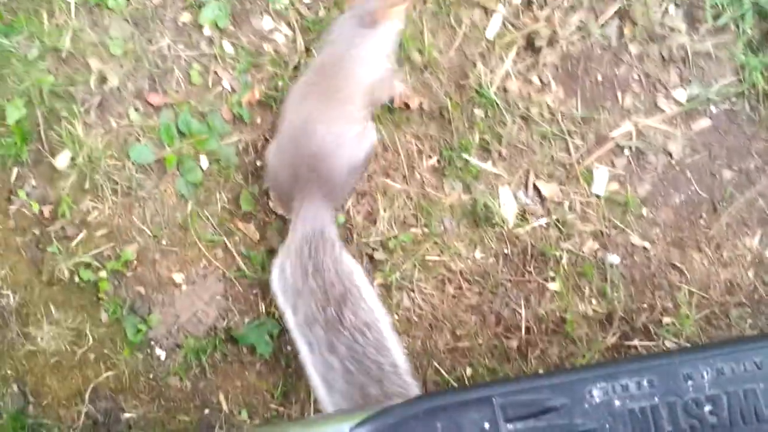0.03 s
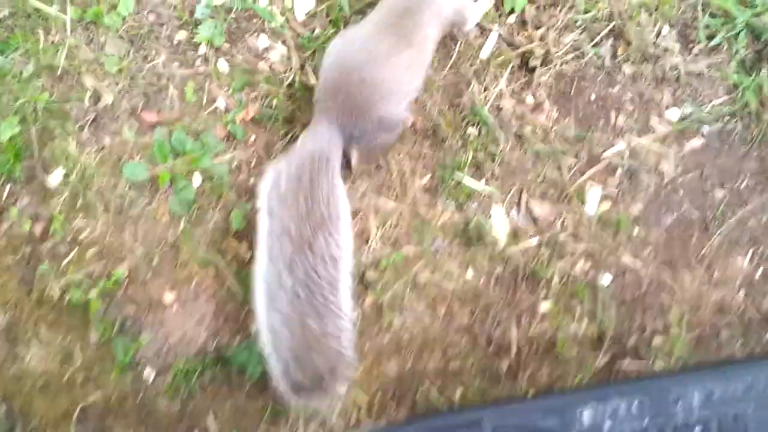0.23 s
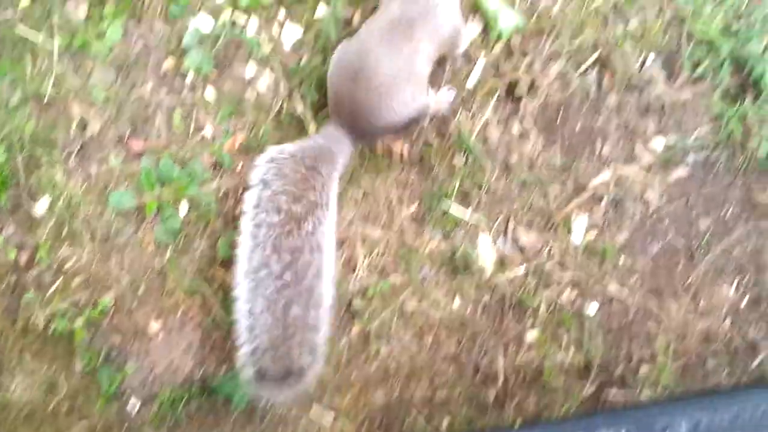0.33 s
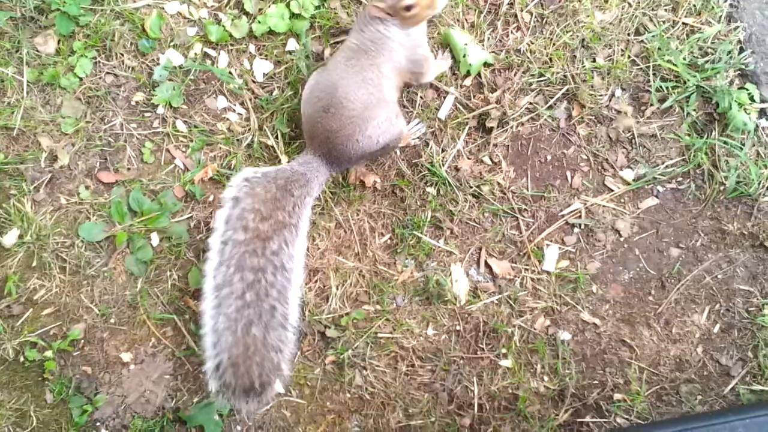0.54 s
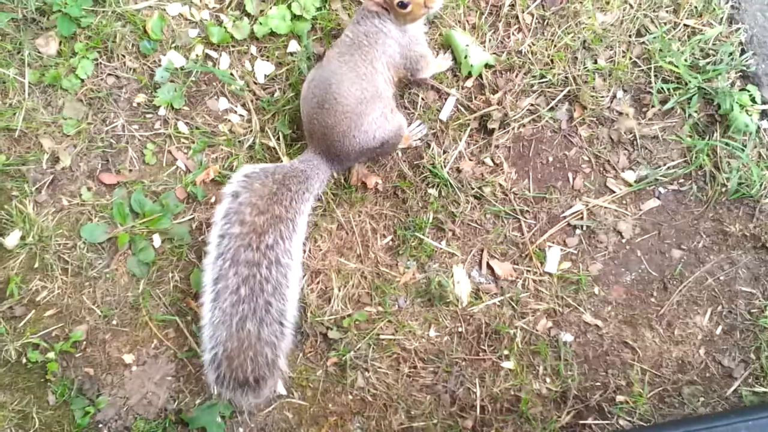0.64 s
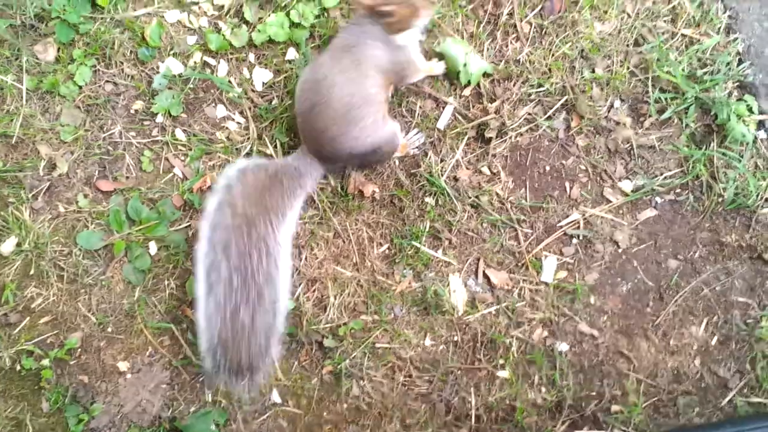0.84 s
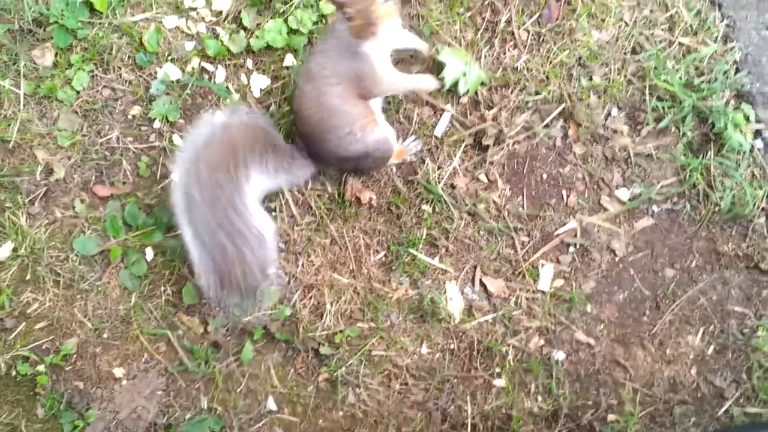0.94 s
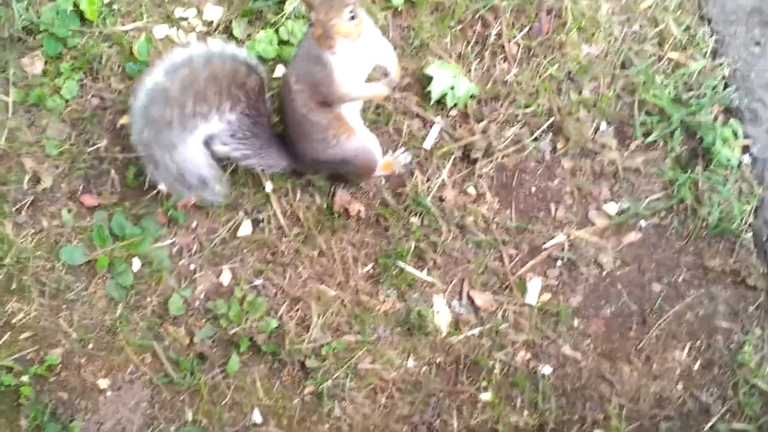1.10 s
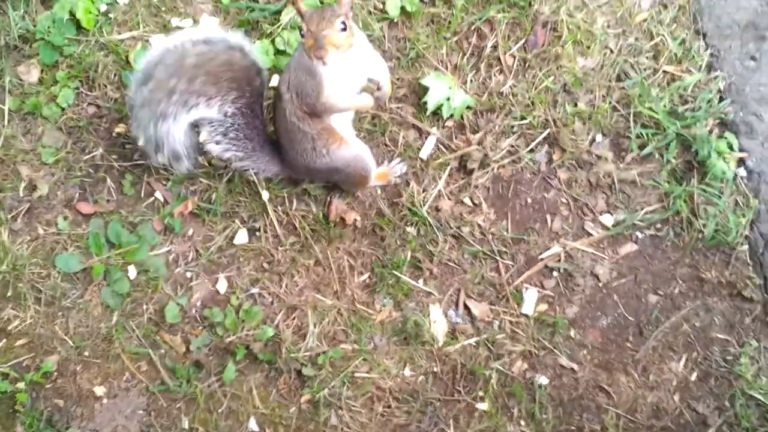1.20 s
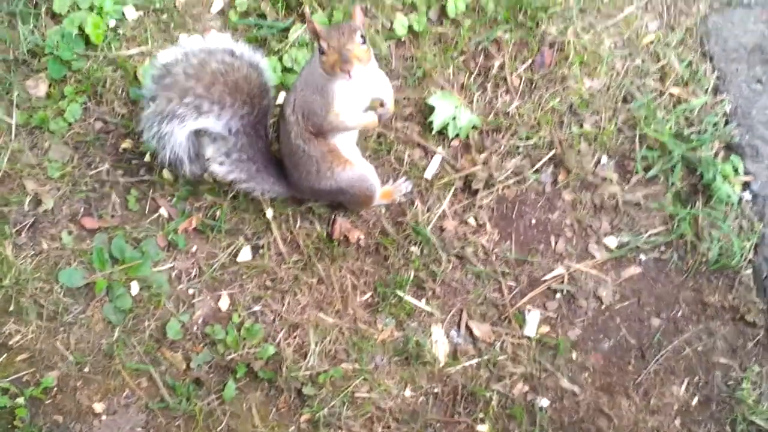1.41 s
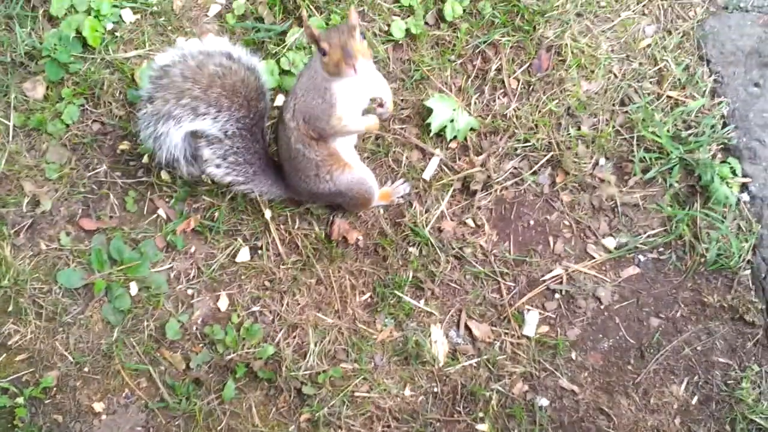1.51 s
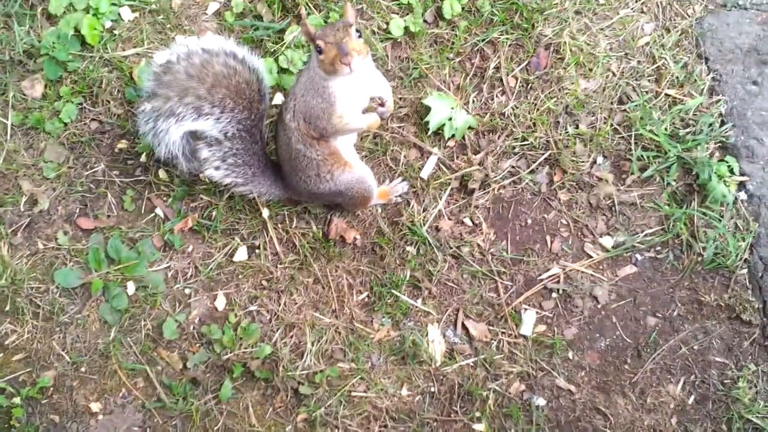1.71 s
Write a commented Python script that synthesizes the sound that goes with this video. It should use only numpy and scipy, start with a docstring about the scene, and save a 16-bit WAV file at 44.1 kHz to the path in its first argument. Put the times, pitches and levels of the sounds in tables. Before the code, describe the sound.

A small bird close to the microphone gives three quick, high, slightly raspy chirps, then a fourth after a pause. A distant bird answers faintly. Dry grass rustles softly over a low outdoor rumble on a lawn.

```python
"""A small bird close to the microphone gives four short, arching chirps over a lawn, the middle two
almost joined. Its syrinx starts each as a low rasp, leaps to a clear whistle and sinks in a second,
lower arch; the yard echoes briefly. A bird far off answers once. Dry litter rustles and ticks
faintly over a distant outdoor rumble. There is one soft handling thump on the microphone, and later
two faint low swells. Both channels carry the same sound."""
import sys
import numpy as np
from scipy import signal
from scipy.fft import rfft, irfft
from scipy.io import wavfile
from scipy.ndimage import uniform_filter1d

SR = 44100
rng = np.random.default_rng(int(sys.argv[2]) if len(sys.argv) > 2 else 0)


def waveform_to_disk(signal):
    """Save audio, clipped to [-1, 1], as 16-bit WAV at the path in sys.argv[1]."""
    frames = np.transpose(np.atleast_2d(signal))
    scaled = np.clip(frames, -1, 1) * 32767
    samples = np.round(scaled).astype(np.int16)
    wavfile.write(sys.argv[1], SR, samples)


N = 77175

# Colour of the open air. Each row: frequency in Hz, relative level in dB.
AIR_COLOUR = [(20, -15), (35, -17.5), (53, 5), (72, -4.5), (100, -5.5), (130, -8), (180, -6), (260, -15.5),
              (450, -19), (650, -20), (880, -14.5), (1300, -17), (2000, -22.5), (3500, -29), (6000, -25),
              (8500, -32.5), (11500, -35.5)]
# A soft low handling thump on the microphone, then two faint swells of low rumble.
# Each row: centre in seconds, half length in seconds, level in dB.
THUMP_AND_SWELLS = [(0.358, 0.048, -42.5), (1.45, .025, -46.5), (1.58, .06, -48.5)]
# Colour of the thump and the swells. Each row: frequency in Hz, relative level in dB.
RUMBLE_COLOUR = [(25, -14), (52, 3.5), (100, -9.5), (180, -12), (300, -18.5), (900, -36), (3000, -73)]

# Colour of dry grass and leaves. Each row: frequency in Hz, relative level in dB.
LITTER_COLOUR = [(1500, -40), (3000, -6.5), (4500, 4), (7000, 6), (9000, -1.5), (11500, -8.5)]
# Soft rustles in the litter. Each row: centre in seconds, half length in seconds, level in dB.
RUSTLES = [(0.093, 0.04, -50), (0.155, 0.027, -41), (0.403, 0.04, -49), (0.806, 0.044, -50),
           (0.874, 0.027, -49), (0.97, 0.033, -56), (1.537, .02, -61), (1.745, 0.012, -51)]
# Dry ticks. Each row: start in seconds, level in dB.
TICKS = [(0.059, -40), (0.716, -35), (.729, -39.5), (.778, -46), (1.017, -43), (1.286, -43), (1.536, -48)]

# The near bird's four chirps and the far bird's answer, one curve each.
# Each row: time in seconds, pitch in Hz, level of the fundamental in dB, level of the overtones in dB.
CHIRP_1 = [(0.178, 1865, -59, -36.5), (0.198, 2178, -56, -33.5), (0.205, 2344, -54, -22),
           (0.21, 3128, -28.5, -11), (0.215, 4157, -31, -35), (0.2205, 4736, 0.5, -66),
           (0.226, 3700, -25.5, -23.5), (0.239, 3685, -16.5, -28), (0.245, 2320, -40, -21),
           (0.252, 2618, -28, -51), (0.259, 3125, -20.5, -16.5), (0.277, 3052, -20.5, -27.5),
           (0.29, 2573, -31, -39), (0.305, 1937, -39, -33)]
CHIRP_2 = [(0.458, 2060, -48, -39), (0.47, 2105, -45.5, -34), (0.487, 2277, -45, -25),
           (0.492, 3100, -36, -8.5), (0.496, 3697, -20.5, -26), (0.503, 3963, -19.5, -29.5),
           (0.512, 3060, -33.5, -9.5), (0.519, 3610, -13.5, -32), (0.526, 2363, -56, -19.5),
           (0.534, 2863, -36, -23.5), (0.555, 2774, -31.5, -26), (0.572, 2242, -36.5, -33)]
CHIRP_3 = [(0.565, 1774, -49, -28), (0.582, 2444, -41, -23.5), (0.591, 2575, -50, -16),
           (0.597, 3512, -28, -11), (0.602, 3936, -27, -27.5), (0.607, 4604, -11, -30.5),
           (0.613, 3616, -21.5, -17.5), (0.624, 3706, -11.5, -35), (0.629, 2315, -43, -11.5),
           (0.636, 2950, -30.5, -22), (0.645, 3166, -33, -32), (0.664, 2792, -24.5, -31.5),
           (0.678, 2330, -37, -40)]
CHIRP_4 = [(1.124, 1850, -46, -32), (1.135, 1881, -44, -31), (1.142, 1890, -41, -23),
           (1.151, 2020, -43, -12.5), (1.155, 2290, -39.5, -31.5), (1.16, 3110, -36, -1),
           (1.164, 3470, -27.5, -36), (1.169, 3720, -33, -23.5), (1.18, 3070, -34, -13),
           (1.188, 3333, -27, -20), (1.194, 2110, -46, -24), (1.199, 2725, -27, -14),
           (1.209, 2908, -31.5, -19.5), (1.22, 2680, -28, -27.5), (1.231, 2070, -46, -33)]
FAR_CHIRP = [(1.514, 3940, -61, -75), (1.535, 3805, -55, -65), (1.565, 3620, -53, -70),
             (1.585, 3490, -61, -69)]
# The near bird's phrase. Each row: curve, jitter on low notes as a share of pitch, base level of the
# rasp in dB, start of the closing warble in seconds, its depth as a share of pitch.
NEAR_CHIRPS = [(CHIRP_1, .035, -26, .274, 0.038), (CHIRP_2, .035, -29, .535, .06),
               (CHIRP_3, 0.023, -30.5, .65, 0.059), (CHIRP_4, 0.0085, -34.5, 1.202, 0.054)]
# Colour that throat and beak give the overtones. Each row: frequency in Hz, relative level in dB.
THROAT_COLOUR = [(3000, -3), (4000, -20.5), (4700, 2.5), (6200, 0.5), (7300, -4), (8300, -19), (10000, -27),
                 (11300, -19.5), (14000, -43)]
# Colour of the rasp in the voice. Each row: frequency in Hz, relative level in dB.
RASP_COLOUR = [(700, -56), (1700, -20), (2600, -23), (3800, -7.5), (4800, -4.5), (6300, 0.5), (7400, -15.5),
               (8600, -20), (10000, -23), (11500, -20)]

# Echoes of the yard. Each row: delay in seconds, time to fall 60 dB in seconds, base level in dB.
YARD_ECHOES = [(.003, 0.124, -8.5), (0.02, .45, -21.5)]
# Colour of those echoes. Each row: frequency in Hz, gain in dB.
ECHO_COLOUR = [(2000, 7.5), (2800, 2), (3600, 1.5), (4400, 0), (6000, -3.5), (9000, 7), (11500, 5.5)]


def undb(db):
    """Decibels to gain."""
    return 10 ** (np.asarray(db) / 20)


def colour_at(hz, colour):
    """Gain of a (Hz, dB) curve at the given frequencies."""
    points_hz, db = np.array(colour, float).T
    return undb(np.interp(np.log(np.maximum(hz, 1)), np.log(points_hz), db))


def tint(sound, colour):
    """Filter by a (Hz, dB) curve."""
    return irfft(rfft(sound) * colour_at(np.arange(N // 2 + 1) * SR / N, colour), N)


def noise(colour):
    """Coloured noise of rms 1."""
    coloured = tint(rng.standard_normal(N), colour)
    return coloured / coloured.std()


def waver(per_second):
    """Smooth random wavering of spread 1."""
    hold = int(SR / per_second)
    steps = np.repeat(rng.standard_normal(N // hold + 1), hold)[:N]
    smooth = uniform_filter1d(uniform_filter1d(steps, hold), hold)
    return smooth / smooth.std()


def swells(t, rows):
    """Gain that rises and falls in a bell shape for each row."""
    return sum(undb(db) * np.exp(-((t - centre) / half_length) ** 2) for centre, half_length, db in rows)


def distant_air(level_db=-42.5, waver_db=1.12):
    """Distant outdoor rumble and hiss waver a little."""
    return noise(AIR_COLOUR) * undb(level_db + waver_db * waver(per_second=7.9))


def dry_litter(t, tick_decay_s=0.0045, grain_db=2.5):
    """Dry grass and leaves give single ticks and grainy rustles, faint at the microphone."""
    ticks = sum(undb(db) * (t >= start) * np.exp(-abs(t - start) / tick_decay_s) for start, db in TICKS)
    rustles = swells(t, RUSTLES) * undb(grain_db * waver(per_second=310))
    return noise(LITTER_COLOUR) * (ticks + rustles)


def throat_overtones(pitch, phase, step_db=-3):
    """Throat and beak shape harmonics 2 to 5, whose joint power stays constant."""
    harmonic = np.arange(2, 6)[:, None]
    hz = harmonic * pitch
    weights = colour_at(hz, THROAT_COLOUR) * undb(step_db * harmonic) * (hz < SR / 2)
    return (weights * np.sin(harmonic * phase)).sum(0) / np.sqrt((weights ** 2).sum(0))


def bird_chirp(t, curve, jitter, rasp_db, warble_start_s, warble_depth):
    """The syrinx sounds a gliding tone with overtones; low notes turn raspy and the end warbles."""
    attack_s, release_s, glide_s, level_smoothing_s = 0.017, 0.0054, 0.0017, 0.0022
    warble_hz, warble_db, warble_rise_s = 173.8, 3, 0.0051
    clear_hz, least_roughness, flutter_db = 2710, 0.28, 3
    times, hz, tone_db, overtone_db = np.array(curve, float).T
    gate = np.clip(.5 + np.minimum((t - times[0]) / attack_s, (times[-1] - t) / release_s), 0, 1)
    warble_age = t - warble_start_s
    warble = np.sin(2 * np.pi * warble_hz * warble_age + .5 * waver(per_second=100))
    warble *= np.clip(warble_age / warble_rise_s, 0, 1)
    glide = uniform_filter1d(np.interp(t, times, hz), int(glide_s * SR))
    pitch = glide * (1 + warble_depth * warble)
    # The voice clears as the pitch climbs past clear_hz.
    roughness = least_roughness + (1 - least_roughness) / (1 + (pitch / clear_hz) ** 12)
    jittered_pitch = pitch * (1 + jitter * roughness * waver(per_second=900))
    phase = 2 * np.pi * np.cumsum(jittered_pitch) / SR

    def envelope(db):
        return uniform_filter1d(undb(np.interp(t, times, db)), int(level_smoothing_s * SR))

    def flutter():
        return undb(flutter_db * roughness * waver(per_second=400) + warble_db * warble)

    tone = envelope(tone_db) * np.sin(phase)
    overtones = envelope(overtone_db) * throat_overtones(pitch, phase)
    # The rasp gains 0.63 dB for each dB that the overtones stand above -25 dB.
    rasp = envelope(rasp_db + 0.63 * (overtone_db + 25)) * roughness * noise(RASP_COLOUR)
    return gate * (flutter() * tone + flutter() * (overtones + rasp))


def yard_echo(t, sound):
    """Near surfaces scatter the sound back to the microphone, with a faint longer tail."""
    response = np.zeros(N)
    for delay, t60, db in YARD_ECHOES:
        tail = rng.standard_normal(N) * (t > delay) * np.exp(-np.log(1000) * t / t60)
        response += undb(db) * tail / np.linalg.norm(tail)
    return signal.fftconvolve(tint(sound, ECHO_COLOUR), response)[:N]


def thump_and_swells(t):
    """A soft low handling thump on the microphone, then two faint swells of low rumble."""
    return noise(RUMBLE_COLOUR) * swells(t, THUMP_AND_SWELLS)


def far_bird(t):
    """A second bird, far from the microphone, answers with one faint falling chirp."""
    return bird_chirp(t, FAR_CHIRP, jitter=.1, rasp_db=-35, warble_start_s=1.56, warble_depth=0.026)


def scene():
    """From one spot on the lawn: both birds and their echoes over air, low thump and litter."""
    t = np.arange(N) / SR
    near = sum(bird_chirp(t, *row) for row in NEAR_CHIRPS)
    far = far_bird(t)
    echoes = yard_echo(t, near + undb(9.5) * far)  # the far bird carries a larger share of echo
    mix = distant_air() + thump_and_swells(t) + dry_litter(t) + near + far + echoes
    return np.array([mix, mix])


def record(dry, top_hz=11650):
    """The recorder cuts the top steeply."""
    return signal.sosfilt(signal.ellip(10, .2, 80, top_hz, fs=SR, output="sos"), dry)


dry = scene()
out = record(dry)
waveform_to_disk(out)
```